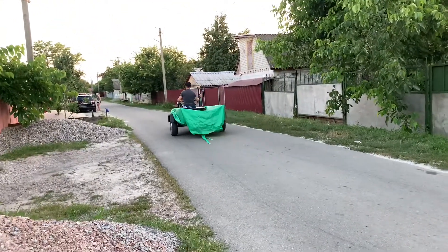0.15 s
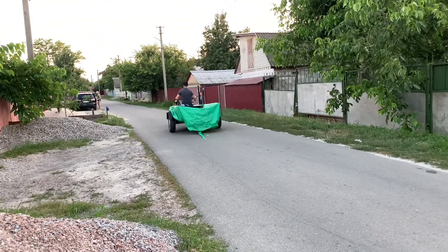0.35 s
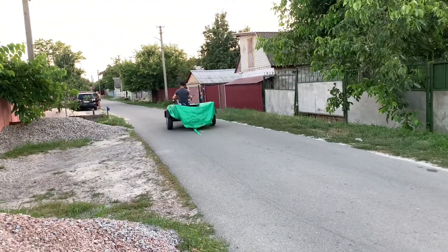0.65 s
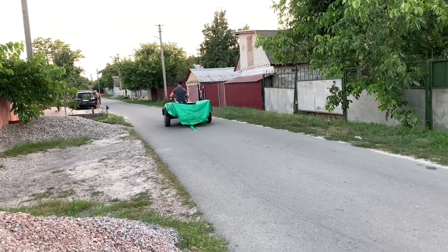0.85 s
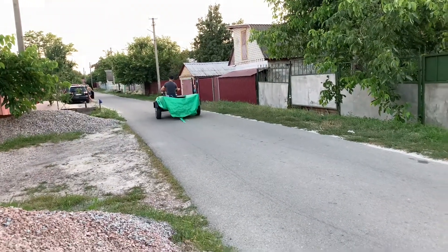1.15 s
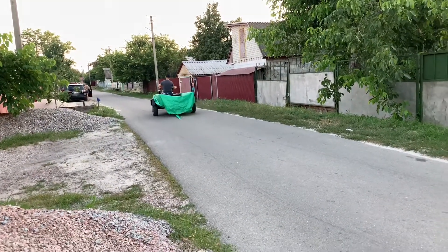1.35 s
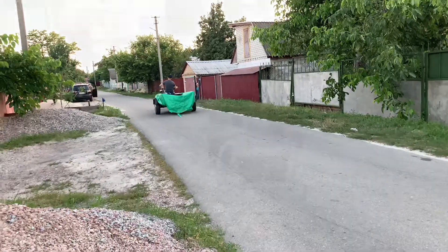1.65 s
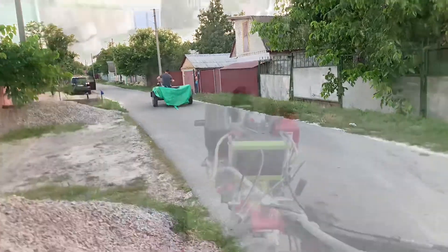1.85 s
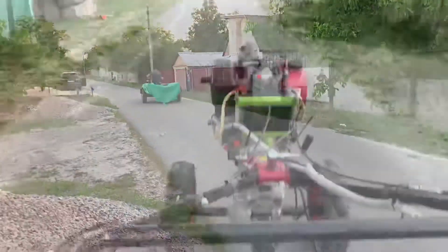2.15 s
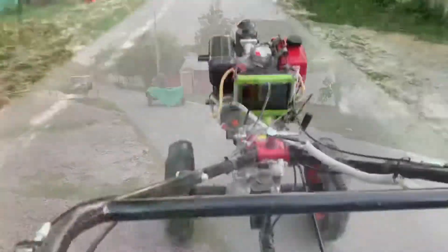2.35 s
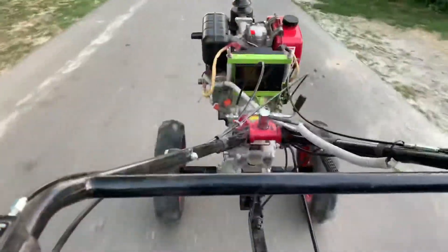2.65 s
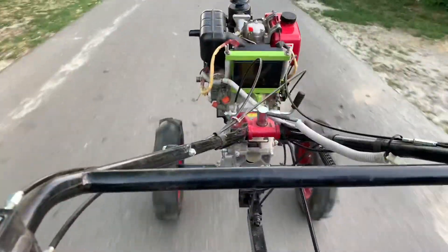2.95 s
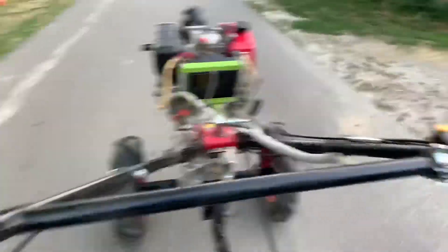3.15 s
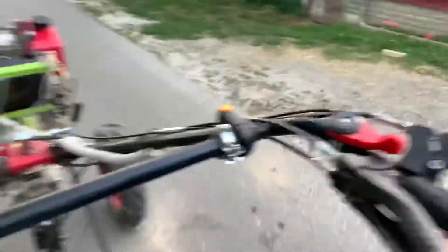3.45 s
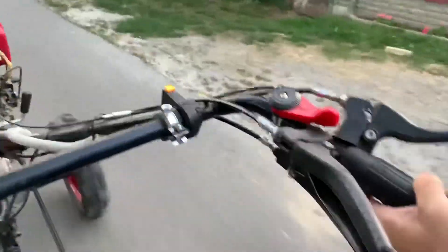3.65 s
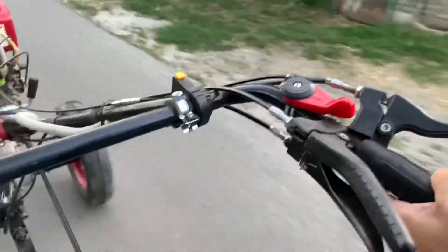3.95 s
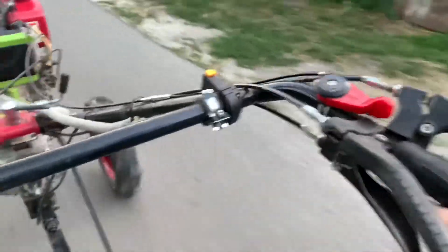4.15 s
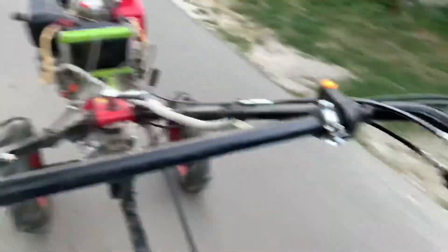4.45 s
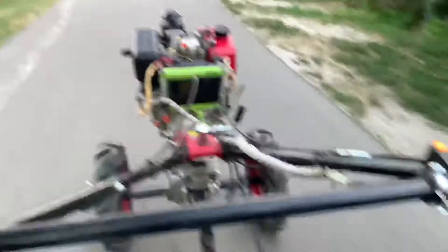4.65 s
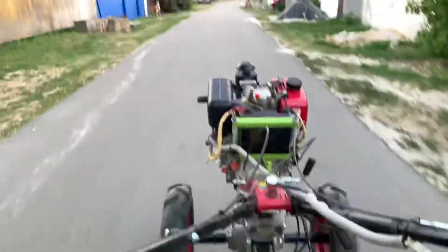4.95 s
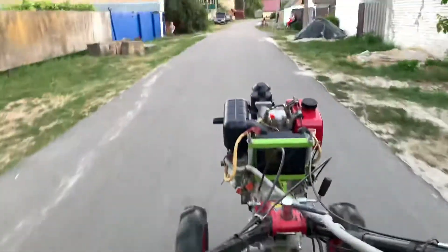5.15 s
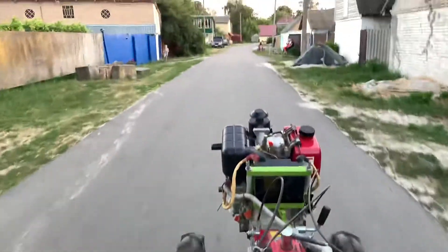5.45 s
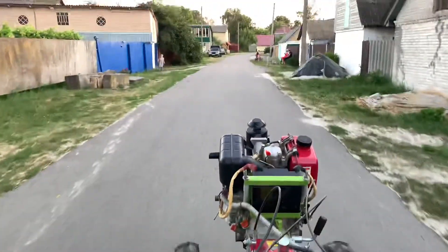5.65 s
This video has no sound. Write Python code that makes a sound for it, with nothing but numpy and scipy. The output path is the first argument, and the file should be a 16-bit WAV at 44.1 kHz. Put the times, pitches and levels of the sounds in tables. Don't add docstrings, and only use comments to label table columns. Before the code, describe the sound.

From 0 to 1.5 s a single-cylinder diesel tractor with a trailer drives away along a village road, heard from behind. Its quick, regular chugging, about 24 strokes a second, is low and blurred, with rattling metal and soft rolling rumble, slowly fading and dulling. At about 1.4 s a cricket gives one very short, high, buzzing chirp with a faint echo. Between 1.5 and 2.5 s the view crossfades to the driver's seat, and the engine becomes close and much louder, about 25 strokes a second: throbbing exhaust, hard ringing knocks, loose tinny clatter and fan hiss. Load eases near 3 s, then knocking jumps at 3.3 s. From 3 to 3.5 s the microphones turn aside, shifting the stereo image and dulling the clatter's treble; they return between 4.2 and 5 s. A short dry handlebar knock lands near 4.6 s. The engine then pulls harder, knocking more strongly until the end.

```python
import sys
import numpy as np
from scipy import signal
from scipy.fft import rfft, irfft
from scipy.io import wavfile
from scipy.ndimage import uniform_filter1d

SR = 44100
rng = np.random.default_rng(int(sys.argv[2]) if len(sys.argv) > 2 else 0)


def wav_record(signal):
    frames = np.transpose(np.atleast_2d(signal))
    bounded = np.clip(frames, -1, 1)
    quanta = np.round(bounded * 32767).astype(np.int16)
    wavfile.write(sys.argv[1], SR, quanta)


def gain_from_decibels(decibels):
    exponent = np.asarray(decibels, float) / 20
    return 10 ** exponent


N = 255780
T = np.arange(N) / SR

# multiple of the firing rate, level in dB.
SEAT_EXHAUST = [(1, -34), (2, -3.5), (3, -2), (4, 0.5), (5, -1), (6, -12.5), (7, -3), (8, -6.5), (9, -17),
                (10, -14.5), (11, -9), (12, -9), (13, -16), (14, -11.5), (15, -17.5), (16, -30),
                (17, -21.5), (18, -40)]
FAR_EXHAUST = [(1, -34), (2, 0), (3, 2), (4, 3), (5, 1.5), (6, 0), (7, 1), (8, 5), (9, -30), (10, -14),
               (11, -7.5), (12, -10), (13, -2), (14, -4), (15, -8), (16, -9), (17, -29.5), (18, -10)]
# frequency in Hz, density in dB per Hz.
RUMBLE = [(30, -40), (45, -2), (100, 1), (200, 4), (350, -4), (500, -7), (900, -80)]
# cycle position 0-1, ringing frequency in Hz,
# t60 in seconds, further lead of the left port in samples.
SEAT_BLOWS = [(.385, 4020, .018, -5), (.4, 3510, .02, -3), (.375, 1360, .022, 0), (.45, 1168, .05, 0),
              (.45, 2108, .05, -2), (.49, 2240, .035, 2), (.5, 2500, .035, 1), (.46, 1600, .025, -3),
              (.5, 690, .03, -4), (.42, 3270, .03, -2), (.45, 4520, .02, 2), (.75, 1170, .03, 0),
              (.91, 860, .026, -5), (.05, 990, .02, -3), (.95, 2110, .04, -2), (.455, 1390, .035, -3),
              (.5, 2980, .03, -2), (.45, 3790, .025, -5)]
FAR_BLOWS = [(.46, 1280, .025, 0), (.58, 1050, .02, 0), (.5, 1850, .025, 4), (.53, 2100, .025, 2),
             (.54, 3900, .008, 3), (.55, 3350, .008, -6), (.55, 2750, .01, -3), (.95, 2200, .02, 1),
             (.15, 560, .03, -8)]
# left level in dB, right level in dB.
FACING = [(-9.5, -7), (-16, -6.5), (9.5, -3), (12, -2.5), (0, 5.5), (-29, -17), (-21, -17), (-7, -35),
          (6.5, -25), (-24, -40), (-37, -23), (-19, 0), (10.5, 4), (3.5, -11), (-13, -14), (-16, -3),
          (-25, -18), (-11, -9)]
HALF_TURNED = [(-13, -7), (1.5, -6), (2, 6), (7, -8), (-5, -21), (-15, -3), (-1.5, -11), (2, 5), (2.1, -19),
               (-9, -2), (-35, -25), (-13, -12), (11.5, 8), (-18, 1), (-2, -26), (6.5, -2), (-21, -10.1),
               (-20, -13.5)]
TURNED_AWAY = [(-19, -15), (-34, -28), (-15, 8), (4, 7), (-4, -2), (-5.5, 1.5), (-2, -6.5), (0.5, 5),
               (5, -24), (-32, -27), (-30, -9.5), (7, -8), (16.5, 9.5), (4, 11), (-8, -8), (1, 2.5),
               (-21, -4), (-27, -15)]
# left level in dB, right level in dB.
FAR_PORTS = [(10.5, -2), (1, -16), (3.5, -1), (1, -0.5), (-14, -15), (-4, -7), (0.5, -19.5), (0, -3),
             (9, 13)]
# frequency in Hz, density in dB per Hz.
SEAT_METAL = [(120, -31), (220, -9), (450, -9), (800, -8), (1250, -8.5), (1800, -10.5), (2150, -8),
              (2600, -11), (3100, -15.5), (3900, -12), (4700, -18.5), (5400, -53.5), (7000, -17.5),
              (12000, -110)]
# frequency in Hz, density in dB per Hz.
FAR_METAL = [(120, -24), (250, -4), (450, -9.5), (800, -7.5), (1270, -6.5), (1650, -11.5), (1850, -10.5),
             (2200, -11), (2800, -17), (3500, -19), (4100, -19), (5000, -28), (6500, -28), (12000, -110)]
# frequency in Hz, density in dB per Hz.
AIR = [(2060, -19), (3500, -12), (9440, -7.5), (11100, -9.5), (11500, -11), (13700, -12.5), (15500, -7),
       (16000, -80)]
# time in seconds, extra knock in dB.
LOAD = [
    (1.7, 2.5),
    (2.3, .3),
    (3.0, -0.6),
    (3.3, 4),
    (3.6, 1.5),
    (4.25, 1.5),
    (4.5, 2.3),
    (4.95, 3),
    (5.8, 4),
]
# time in seconds, share turned 0-1, left port lead in samples.
TURN = [(1.7, 0.04, 4.8), (2.9, 0, 6.64), (3.12, 0.5, 10.3), (3.3, 0.98, 15.8), (3.5, 1, 18), (4.15, 1, 17),
        (4.36, 0.93, 14.7), (4.52, 0.66, 10.5), (4.72, 0.5, 7.2), (4.95, 0.05, 4.9), (5.8, 0, 5.1)]
# time in seconds, firing rate in Hz.
FAR_RATE = [(0, 23.55), (.3, 23.75), (.6, 23.76), (.9, 23.7), (1.2, 23.85), (1.5, 24.1), (1.8, 24.43),
            (2.45, 24.36)]
# time in seconds, level in dB.
JOLTS = [
    (4.565, -25),
]

SEAT_RATE_HZ, SEAT_START = 25.243, .04
SEAT_EXHAUST_DB, SEAT_KNOCK_DB, SEAT_METAL_DB, SEAT_HISS_DB = -22, -27, -22.5, -31.5
EXHAUST_PER_LOAD, METAL_PER_LOAD, HISS_PER_LOAD = -0.34, -0.35, -0.14
TURNED_EXHAUST_DB = 0.8
SHADE, SHADE_HZ = 0.35, 3300
STROKE_FALL, STROKE_REST = 0.23, 0.53
FAR_START_M, FAR_SPEED_M_S = 16.3, 2.23
FAR_EXHAUST_DB, FAR_METAL_DB, FAR_KNOCK_DB = -32.5, -28.5, -9
EXHAUST_LOSS, METAL_LOSS, KNOCK_LOSS = 0.22, 1.33, 4
BLUR, BLUR_PER_M = 1, 0.094
BUILD = .5
WHEEL_RATE_HZ = 2.6
CHIRP_S, CHIRP_DB = 1.419, -30.5
CHIRP_LEAD_S, CHIRP_RISE_DB_S, CHIRP_FALL_DB_S = 0.029, 350, 700
ECHO_DB, ECHO_T60_S = -20, 1.6
DISSOLVE_START_S, DISSOLVE_END_S = 1.5, 2.524


def level(x, db):
    return x * gain_from_decibels(db) / np.sqrt(np.mean(x ** 2))


def noise():
    return rng.standard_normal(N)


def columns(table):
    s, *rest = np.transpose(table)
    return [np.interp(T, s, c) for c in rest]


def colour(x, points):
    hz, db = np.transpose(points)
    f = np.arange(N // 2 + 1) * SR / N + 1
    gain = gain_from_decibels(np.interp(np.log(f), np.log(hz), db))
    return level(irfft(rfft(x) * gain, N), 0)


def walk(rate):
    steps = np.arange(0, T[-1] * rate + 2)
    return np.interp(T * rate, steps, rng.standard_normal(len(steps)))


def ports(x, lead, pan_db=0.):
    n = np.arange(N)
    left = np.interp(n + lead / 2, n, x) * gain_from_decibels(pan_db / 2)
    right = np.interp(n - lead / 2, n, x) * gain_from_decibels(-pan_db / 2)
    return np.array([left, right])


def ring(x, hz, t60):
    r = np.exp(-np.log(1000) / (t60 * SR))
    turn = 2 * np.pi * hz / SR
    return signal.lfilter([np.sin(turn)], [1, -2 * r * np.cos(turn), r * r], x)


def gate(cycle, place, fall, rest):
    return rest + uniform_filter1d(np.exp(-((cycle - place) % 1) / fall), size=170)


def exhaust(cycle, orders, place, sweep, shift, wobble_db, rock_db, rumble_db):
    out = 0
    for k, db in orders:
        db = db + wobble_db * walk(6)
        if k < 5:
            db += rock_db * np.sin(2 * np.pi * WHEEL_RATE_HZ * T + 2.04 * k)
        phase = k * (cycle - place) - sweep * k * k + shift
        out = out + gain_from_decibels(db) * np.cos(2 * np.pi * phase)
    rumble = gain_from_decibels(rumble_db + 1.1 * walk(2.93)) * colour(noise(), RUMBLE)
    return level(out, 0) + rumble


def blows(cycle, table, sides, lead, scatter_db, jitter_s, shared_db, chatter_db, chatter_s):
    turns = np.arange(int(cycle[0]), int(cycle[-1]) + 1)
    firing_db = shared_db * rng.standard_normal(len(turns))
    play = gain_from_decibels(chatter_db) * noise()
    out = 0
    for k, ((place, hz, t60, extra), side) in enumerate(zip(table, sides)):
        chance = rng.standard_normal((len(turns), 2))
        at = np.interp(turns + place, cycle, T) + jitter_s * chance[:, 0]
        hits = np.zeros(N)
        hits[np.clip(at * SR, 0, N - 1).astype(int)] = gain_from_decibels(firing_db + scatter_db * chance[:, 1])
        hits[[0, -1]] = 0
        after = signal.lfilter([1], [1, -np.exp(-1 / (chatter_s * SR))], hits)
        hits += after * np.roll(play, shift=k * 9973) * hz / 2000
        blow = ring(ring(hits, hz, t60), hz, BUILD * t60) * hz / t60
        out = out + ports(blow, lead + extra) * side
    return level(out, 0)


def clatter(cycle, lead, points, place, fall, rest, loose_db, wide_db):
    pattern = np.interp(cycle % 1, np.linspace(0, 1, 1750), rng.standard_normal(1750))
    rattle = noise() * gain_from_decibels(2.2 * rng.exponential(size=N))
    shape = gate(cycle, place, fall, rest)
    direct = colour(shape * pattern * gain_from_decibels(1.65 * walk(9)), points)
    direct = direct + gain_from_decibels(loose_db) * colour(shape * rattle, points)
    wide = [colour((.4 + shape) * noise(), points) for _ in range(2)]
    wide = signal.lfilter(*signal.butter(1, 1000, "high", fs=SR), wide)
    return level(ports(direct, lead) + gain_from_decibels(wide_db) * wide, 0)


def hiss(cycle, place, fall, rest, apart_db):
    shape = gate(cycle, place, fall, rest) * gain_from_decibels(.4 * walk(25) + 1.1 * walk(9))
    common = colour(shape * noise() * gain_from_decibels(1.4 * rng.exponential(size=N)), AIR)
    apart = [colour(shape * noise(), AIR) for _ in range(2)]
    return np.array([np.roll(common, shift=8), common]) + gain_from_decibels(apart_db) * np.array(apart)


def turned_gains(turned):
    for row in zip(FACING, HALF_TURNED, TURNED_AWAY):
        yield [np.interp(turned, [0, .5, 1], gain_from_decibels(port)) for port in np.transpose(row)]


def seat_tractor():
    load_db, = columns(LOAD)
    turned, lead = columns(TURN)
    turned = np.clip(turned, 0, 1)
    low_db = SEAT_EXHAUST_DB + EXHAUST_PER_LOAD * load_db + TURNED_EXHAUST_DB * turned
    knock_db = SEAT_KNOCK_DB + load_db
    metal_db = SEAT_METAL_DB + METAL_PER_LOAD * load_db
    hiss_db = SEAT_HISS_DB + HISS_PER_LOAD * load_db
    cycle = SEAT_START + SEAT_RATE_HZ * T
    low = exhaust(cycle, SEAT_EXHAUST, place=.72, sweep=.13, shift=.17,
                  wobble_db=.8, rock_db=1.1, rumble_db=-11.5)
    knock = blows(cycle, SEAT_BLOWS, turned_gains(turned), lead, scatter_db=1.2, jitter_s=.00006,
                  shared_db=.9, chatter_db=-31, chatter_s=.005)
    metal = clatter(cycle, lead, SEAT_METAL, place=.42, fall=STROKE_FALL, rest=STROKE_REST,
                    loose_db=0, wide_db=0)
    treble = signal.sosfiltfilt(signal.butter(3, SHADE_HZ, "high", fs=SR, output="sos"), metal)
    metal = metal - SHADE * np.sqrt(turned) * treble
    air = hiss(cycle, place=.42, fall=.35, rest=1.3, apart_db=-10.5)
    layers = gain_from_decibels(low_db) * ports(low, lead + 2.2, -2.2) + gain_from_decibels(knock_db) * knock
    return layers + gain_from_decibels(metal_db) * metal + gain_from_decibels(hiss_db) * air


def far_tractor():
    hz, = columns(FAR_RATE)
    gone_m = FAR_SPEED_M_S * T
    away_db = 20 * np.log10(1 + gone_m / FAR_START_M)
    low_db = FAR_EXHAUST_DB - EXHAUST_LOSS * away_db
    metal_db = FAR_METAL_DB - METAL_LOSS * away_db
    knock_db = FAR_KNOCK_DB - KNOCK_LOSS * away_db
    blur = BLUR + BLUR_PER_M * gone_m
    cycle = np.cumsum(hz) / SR
    low = exhaust(cycle, FAR_EXHAUST, place=.44, sweep=.164, shift=-.19,
                  wobble_db=2.0, rock_db=1.0, rumble_db=-11.5)
    sides = gain_from_decibels(np.array(FAR_PORTS))[:, :, None]
    knock = blows(cycle, FAR_BLOWS, sides, 19.0, scatter_db=1.5, jitter_s=.0003,
                  shared_db=1.1, chatter_db=-19, chatter_s=.008)
    metal = clatter(cycle, 19.0, FAR_METAL, place=.48, fall=.25, rest=blur, loose_db=-1, wide_db=5)
    air = gain_from_decibels(-16.5) * hiss(cycle, place=.5, fall=.3, rest=2.5, apart_db=-11)
    block = metal + gain_from_decibels(knock_db) * knock + air
    return gain_from_decibels(low_db) * ports(low, 3.7, -1.8) + gain_from_decibels(metal_db) * block


def jolts():
    out = np.zeros(N)
    for s, db in JOLTS:
        out += gain_from_decibels(db) * (T > s) * np.exp(-np.abs(T - s) / 0.012) * noise()
    return signal.sosfilt(signal.butter(6, 14500, fs=SR, output="sos"), out)


def cricket():
    since = T - CHIRP_S
    chirp = gain_from_decibels(np.minimum(CHIRP_RISE_DB_S * since, -CHIRP_FALL_DB_S * since)) * (since > -CHIRP_LEAD_S)
    echo = gain_from_decibels(ECHO_DB - 60 * np.abs(since) / ECHO_T60_S) * (since > 0)
    scrape = level(ring(ring(noise(), 10250, 0.013), 10220, 0.0084), 0)
    teeth = gain_from_decibels(CHIRP_DB + 2.5 * np.cos(2 * np.pi * 105 * since))
    return np.array([np.roll(scrape, shift=4), scrape]) * (chirp + echo) * teeth


def dissolve():
    return np.clip((T - DISSOLVE_START_S) / (DISSOLVE_END_S - DISSOLVE_START_S), 0, 1)


def scene():
    seat, roadside = seat_tractor(), far_tractor() + cricket()
    return dissolve() * seat + (1 - dissolve()) * roadside + jolts()


def band_limit(x):
    return signal.sosfilt(signal.butter(12, 17090, fs=SR, output="sos"), x)


def record(dry):
    mix = signal.sosfilt(signal.butter(2, 35, "high", fs=SR, output="sos"), dry)
    return band_limit(mix)


dry = scene()
out = record(dry)
wav_record(out)
```